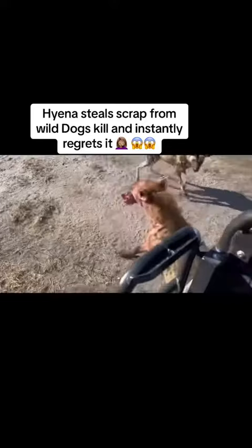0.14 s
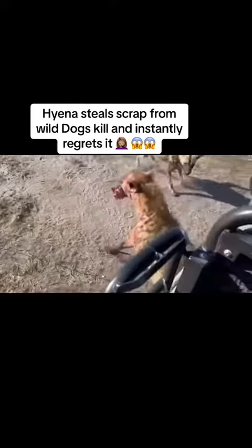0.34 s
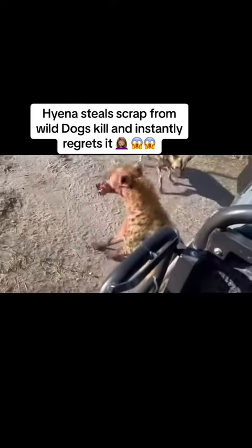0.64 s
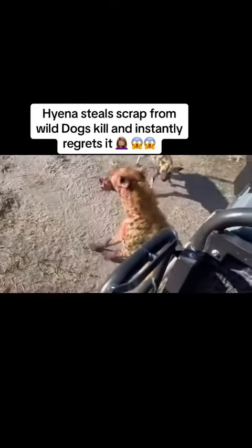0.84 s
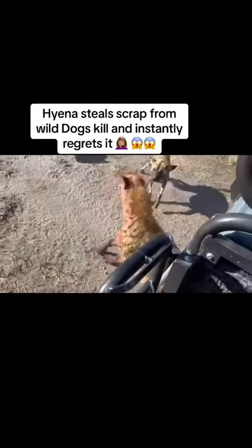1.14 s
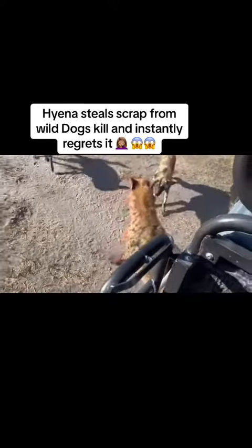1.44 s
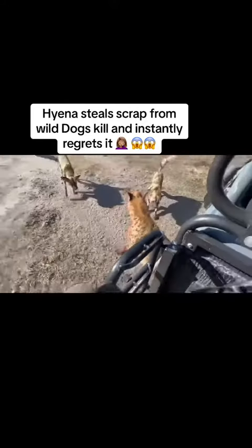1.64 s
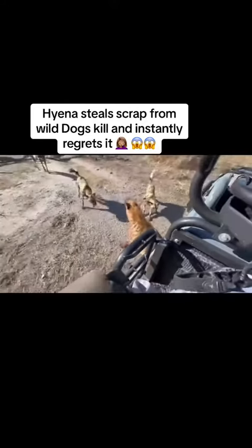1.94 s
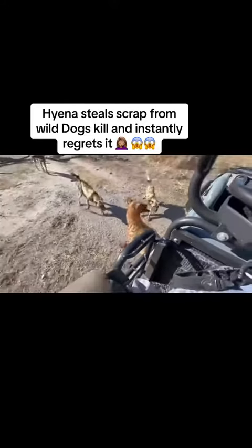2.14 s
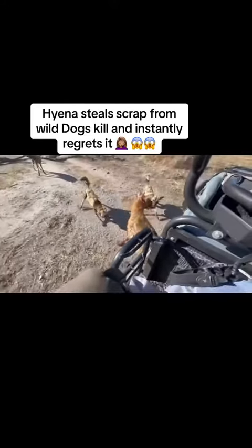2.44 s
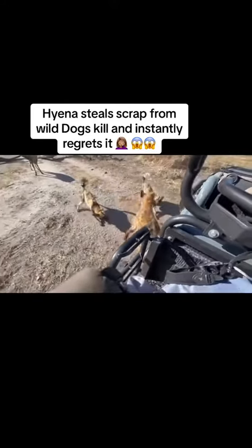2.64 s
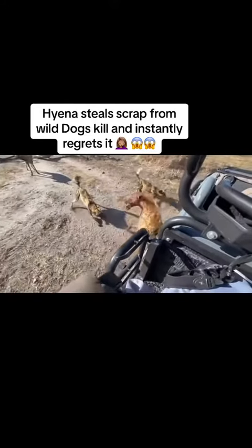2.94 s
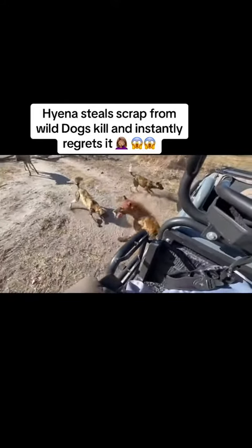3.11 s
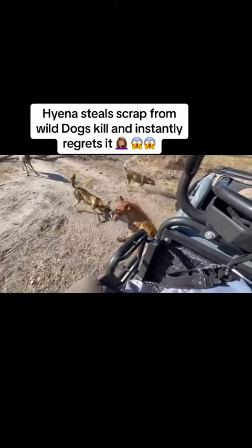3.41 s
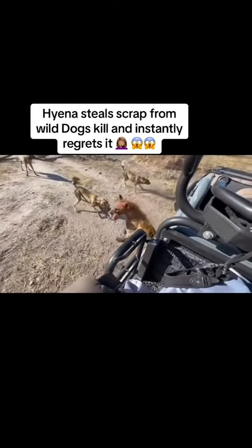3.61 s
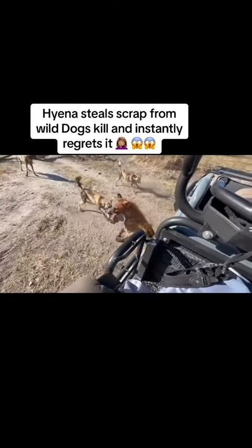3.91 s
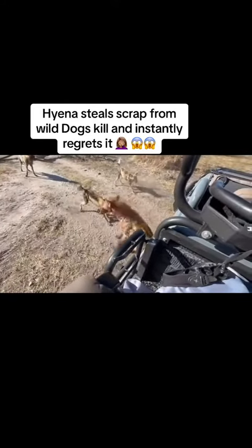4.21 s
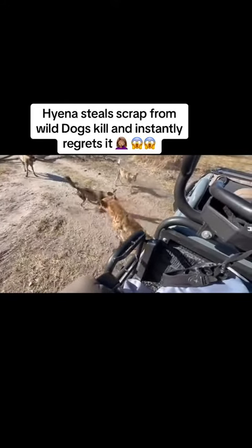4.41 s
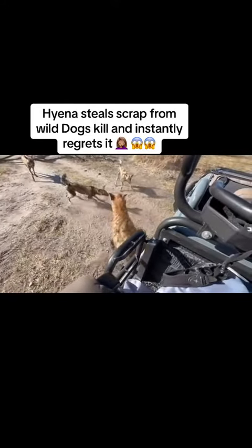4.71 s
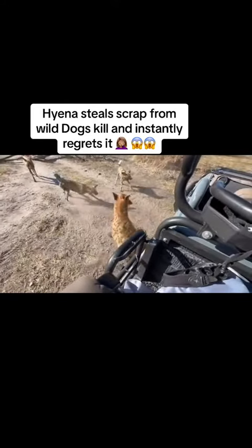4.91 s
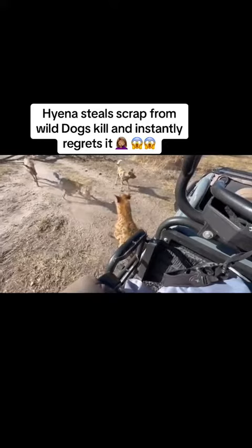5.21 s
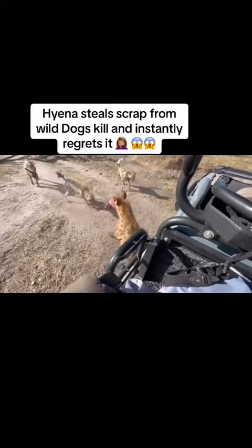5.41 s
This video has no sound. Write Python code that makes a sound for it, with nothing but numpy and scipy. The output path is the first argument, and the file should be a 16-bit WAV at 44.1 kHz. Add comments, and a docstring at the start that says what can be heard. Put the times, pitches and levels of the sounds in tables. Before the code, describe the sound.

A hyena gives a series of short, hoarse growls close by while wild dogs answer with high, wavering squeals, brief snarls and a couple of yips near the end. Paws scuff and slide on dry gravel throughout. Wind thumps against the microphone, hardest in the first second along with a few dull knocks, over a faint steady hiss of open bush.

```python
"""Hyena and wild dogs

A hyena growls hoarsely beside an open vehicle: slack vocal folds slap and excite the resonances of its
throat. Wild dogs squeal and yip around it in harmonic tones, and snarl. Paws scuff the dry gravel, and
turbulent wind buffets the microphone over the steady hiss of the bush."""
import sys
import numpy as np
from scipy import signal
from scipy.io import wavfile
from scipy.ndimage import uniform_filter1d

SR = 44100
rng = np.random.default_rng(int(sys.argv[2]) if len(sys.argv) > 2 else 0)


def generate_wav(sig):
    """Save sig (samples, or channels by samples) to the path in sys.argv[1] as 16-bit PCM at SR."""
    pcm = np.round(np.clip(np.atleast_2d(sig).T, -1, 1) * 32767).astype(np.int16)
    wavfile.write(sys.argv[1], SR, pcm)


N = 244785

# Five resonances of the throat at rest: centre_hz, nominal_width_hz, offset_db
THROAT_RESONANCES = [(386.8, 182, 0), (865, 214, 0), (1308, 290, -1.5), (2059, 200, -16.5),
                     (3590, 130, -28)]
# Throat shape, one row a growl: mean_third_resonance_hz, looseness (0-1), upper_over_third_db
THROAT_SHAPES = [(1345, 0.55, -2), (1300, 0.52, -9), (1385, 0.86, -1), (1410, 1, 3), (1355, 0.52, 1),
                 (1315, 0.37, 2.5), (1328, 0.54, 5.5)]
# Fold vibration, one row a growl: slap_rate_hz, alternate_slap_weakening (0-1)
FOLD_VIBRATIONS = [(80, .2), (120, .2), (86, .2), (95, .1), (95, .15), (100, .15), (95, .15)]
# Resonance contours, one table a growl: time_s, first_db, second_db, third_db, second_resonance_hz
GROWL_CONTOURS = [
    [(0.008, -13.5, -27, -30, 830), (0.03, -19.5, -29, -26.5, 850), (0.082, -19, -33.5, -29, 900),
     (0.182, -21, -28.5, -27.5, 780), (0.246, -16, -31.5, -28, 845), (0.29, -16.5, -28, -23.5, 785),
     (0.314, -20.5, -26.5, -29.5, 824), (0.452, -25, -36, -26, 768), (0.472, -15.5, -17.5, -27.5, 734),
     (0.542, -30, -43, -31.5, 755), (0.598, -25.5, -43, -40, 736), (0.63, -35, -46, -51, 759)],
    [(1.272, -37, -22.5, -35, 874), (1.298, -19.5, -30, -35, 841), (1.332, -24, -24, -34, 850),
     (1.352, -26, -24.5, -27, 867), (1.414, -24, -26, -28.5, 854), (1.436, -26.5, -28, -26, 857),
     (1.492, -26, -28.5, -35, 854), (1.598, -41, -39.5, -44, 844), (1.62, -46, -50, -51, 859)],
    [(2.484, -19.5, -31, -53, 790), (2.516, -22, -29.5, -39, 864), (2.542, -22.5, -29, -36, 840),
     (2.558, -19, -19.5, -37, 810), (2.588, -18, -23, -28.5, 784), (2.624, -17.5, -21, -32, 750),
     (2.68, -23, -26.5, -29, 735), (2.696, -20, -37, -33.5, 720), (2.77, -38.5, -52, -53, 732)],
    [(2.84, -39, -60, -54, 820), (2.884, -37, -42, -58, 820), (2.924, -33, -47, -36, 800),
     (2.96, -54, -48, -65, 800)],
    [(3.25, -35, -71, -48, 770), (3.266, -31.5, -66, -52, 750), (3.304, -42, -51.5, -59, 774),
     (3.34, -29.5, -43, -57, 745), (3.388, -26.5, -39, -39, 730), (3.438, -24.5, -47, -48, 735),
     (3.498, -29, -37, -47, 750), (3.554, -38.5, -57, -52, 760), (3.57, -45, -60, -45, 750)],
    [(4.12, -37, -38, -40, 830), (4.152, -28.5, -32, -27.5, 846), (4.188, -32, -34, -33, 825),
     (4.208, -39, -41, -28, 800), (4.238, -38, -31, -26.5, 786), (4.274, -48, -33, -44, 760),
     (4.296, -32, -34, -32, 780), (4.328, -30, -25, -32.5, 753), (4.446, -31, -29.5, -26.5, 808),
     (4.52, -36, -29, -38.5, 807), (4.566, -43, -30, -35, 870), (4.596, -41, -40, -50, 840),
     (4.622, -40, -35, -58, 815), (4.66, -44, -52, -45, 807)],
    [(5.21, -35, -38, -42, 759), (5.234, -41, -35, -35.5, 763), (5.298, -30.5, -37, -33, 684),
     (5.374, -36.5, -39.5, -36.5, 700), (5.416, -31.5, -36, -28.5, 710), (5.444, -39, -39, -31, 735),
     (5.472, -28.5, -37.5, -28, 790), (5.528, -35, -48, -46, 700), (5.55, -41, -37, -50, 689)],
]
THIRD_GLIDE_SHARE, THROAT_SHAKE_SHARE = 0.27, 0.03
GROWL_NOTCH_HZ, GROWL_NOTCH_WIDTH_HZ = 1063, 143  # a dark gap between the second and third resonances
GROWL_ATTACK_S, GROWL_RELEASE_S = 0.005, 0.013


def growl(contour, third_hz, looseness, upper_db, slap_hz, weakening):
    """Source and filter: fold slaps ring the throat; resonances of opposite sign leave dark valleys."""
    start_s, (first_db, second_db, third_db, second_hz) = unrolled(contour)
    t = np.arange(len(second_hz)) / SR
    drive = fold_slaps(len(t), slap_hz, jitter=0.22, air_share=0.54, weakening=weakening)
    third_hz = third_hz * (second_hz / second_hz.mean()) ** THIRD_GLIDE_SHARE
    glides = [1, second_hz / THROAT_RESONANCES[1][0], third_hz / THROAT_RESONANCES[2][0], 1, 1]
    levels_db = [first_db, second_db, third_db, third_db + upper_db, third_db + upper_db]
    voice = 0
    for k, (rest_hz, width, offset_db) in enumerate(THROAT_RESONANCES):
        # a loose, shaking throat smears each resonance into a broad band
        shake = 1 + THROAT_SHAKE_SHARE / np.sqrt(k + 1) * wander(len(t), 18)
        hz = rest_hz * glides[k] * shake
        tight = unit_rms(resonate(drive, hz, 0.28 * width))
        flanks = sum(resonate(drive, hz + side * 0.37 * width, width) for side in (-1, 1))
        smeared = unit_rms(resonate(flanks, hz, 0.73 * width))
        ringing = steady_breath(unit_rms((1 - looseness) * tight + looseness * smeared))
        voice = voice + (-1) ** k * gain_of(offset_db + levels_db[k]) * ringing
    voice = butterworth(voice, 3, 250, "high")  # the head radiates little bass
    notch = signal.iirnotch(GROWL_NOTCH_HZ, GROWL_NOTCH_HZ / GROWL_NOTCH_WIDTH_HZ, fs=SR)
    voice = signal.lfilter(*notch, voice)
    surges = unit_rms(gain_of(0.5 * wander(len(t), 9.1)))
    envelope = np.clip(np.minimum(t / GROWL_ATTACK_S, (t[-1] - t) / GROWL_RELEASE_S), 0, 1)
    return start_s, surges * envelope * voice


def fold_slaps(count, slap_hz, jitter, air_share, weakening):
    """Glottal pulses: slack folds slap unevenly with puffs of air; every second slap may be weaker."""
    cycles = np.cumsum(slap_hz * (1 + jitter * wander(count, 40))) / SR
    force = 1 - weakening * (np.floor(cycles) % 2)
    slaps = np.diff(np.floor(cycles), prepend=0) * force * gain_of(2 * wander(count, 60))
    puffs = force * (1 + np.exp(-(cycles % 1) / 2.7)) * rng.standard_normal(count)
    return (1 - air_share) * unit_rms(slaps) + air_share * unit_rms(puffs)


def steady_breath(x):
    """Compression: steady breath pressure evens out the swings slower than a few slaps."""
    envelope = np.sqrt(abs(uniform_filter1d(x ** 2, size=1100)) + 0.05)
    return unit_rms(x / envelope ** 0.55)


# Chest hum under the end of the third growl: time_s, pitch_hz, fundamental_db, second_harmonic_db
CHEST_CONTOUR = [(2.572, 103.6, -50, -33), (2.62, 100, -40, -23), (2.645, 99.7, -38, -28),
                 (2.658, 102, -23, -28), (2.706, 92, -30, -38.5), (2.746, 88, -24.5, -38.5),
                 (2.772, 85, -39, -50), (2.8, 85, -48, -54)]


def chest_hum():
    """Nearly periodic vibration: the chest hums in two low, slightly unsteady harmonics."""
    start_s, (hz, first_db, second_db) = unrolled(CHEST_CONTOUR)
    phase = 2 * np.pi * np.cumsum(hz * (1 + 0.03 * wander(len(hz), 25))) / SR
    hum = gain_of(first_db) * np.sin(phase) + gain_of(second_db) * np.sin(2 * phase)
    return start_s, np.sqrt(2) * hum


# Hoarseness, one value a squeal: greatest_flutter_depth (0-1)
FLUTTER_LIMITS = [.2, .45, .28, .28, .25, .33, .3, .34, .5, .5, .35]
# Dog cries, one table a squeal: time_s, pitch_hz, fundamental_db, second_harmonic_db, third_harmonic_db
SQUEAL_CONTOURS = [
    [(0.6, 1874, -34, -55, -61), (0.618, 1910, -32, -53, -52), (0.65, 1919, -32.5, -48.5, -69),
     (0.736, 1931, -35, -48, -57), (0.75, 1941, -42, -42.5, -72), (0.818, 1982, -35, -43, -71),
     (0.85, 2007, -43.5, -71, -69), (0.896, 1985, -36, -43, -70), (0.906, 1934, -38, -34, -53),
     (0.924, 1877, -32, -31, -53), (0.956, 1883, -31.5, -45, -71), (1.008, 1809, -39, -46, -59),
     (1.036, 1823, -30, -40.5, -71), (1.052, 1847, -30, -46, -49), (1.076, 1846, -33, -46, -50),
     (1.108, 1826, -34.5, -42.5, -71), (1.166, 1872, -35.5, -51, -70), (1.174, 1835, -45, -43, -57),
     (1.196, 1940, -30.5, -45, -68), (1.222, 1930, -33.5, -46, -49), (1.246, 1960, -39, -43, -59),
     (1.262, 1930, -41, -67, -72), (1.286, 1900, -47, -69, -70), (1.3, 1891, -57, -50, -71)],
    [(1.565, 2143, -25, -45, -61), (1.575, 2108, -16, -38, -51), (1.579, 2073, -14, -39, -76),
     (1.581, 2058, -10.5, -44, -57), (1.591, 2062, -11.5, -42, -55), (1.603, 2107, -9, -26, -40.5),
     (1.621, 2103, -13, -29, -49), (1.643, 1962, -21.5, -39, -73), (1.653, 1955, -21, -40, -61),
     (1.655, 1952, -21.5, -36, -71), (1.673, 1980, -21.5, -38, -56), (1.679, 2025, -24.5, -42, -66),
     (1.703, 2050, -14.5, -43, -55), (1.713, 2042, -16.5, -39, -44), (1.737, 1980, -27.5, -38, -72),
     (1.749, 1995, -29, -33, -43), (1.777, 1928, -23, -38, -63), (1.795, 1920, -42, -50, -67)],
    [(2.04, 1866, -37, -72, -71), (2.062, 1877, -28, -53, -50), (2.078, 1920, -40, -34.5, -76),
     (2.094, 2080, -31, -51, -79), (2.118, 2038, -36, -41, -70), (2.166, 2100, -32, -47, -79),
     (2.204, 2106, -32.5, -44, -60), (2.236, 2100, -45, -69, -79), (2.24, 2093, -47, -59, -73)],
    [(2.4, 1928, -52, -41, -67), (2.422, 1836, -34, -29.5, -35.5), (2.442, 1793, -31.5, -36, -69),
     (2.47, 1720, -45, -56, -66), (2.486, 1774, -34, -48, -79), (2.504, 1795, -36, -52, -64),
     (2.52, 1765, -45, -45, -76)],
    [(2.59, 1909, -46, -46, -54), (2.6, 1903, -35, -38, -48), (2.622, 1843, -47, -32, -48),
     (2.64, 1850, -42, -31.5, -51), (2.656, 1774, -42, -33, -48), (2.672, 1779, -43, -38, -37),
     (2.692, 1791, -41, -35, -45), (2.714, 1796, -33, -31, -43), (2.728, 1814, -30, -34, -39),
     (2.738, 1818, -33, -38, -42), (2.762, 1802, -28.5, -26.5, -44), (2.784, 1769, -39, -34, -62),
     (2.8, 1820, -43, -52, -55)],
    [(3.044, 2050, -21, -44, -56), (3.056, 2011, -27, -34, -35.5), (3.068, 1998, -27, -32, -40),
     (3.094, 2092, -16.5, -25.5, -50), (3.108, 2144, -15, -38.5, -55), (3.132, 2079, -20, -28, -53),
     (3.152, 2066, -25.5, -35, -53), (3.162, 2068, -28, -32, -47), (3.18, 2076, -24.5, -29.5, -50.5),
     (3.212, 2077, -15.5, -29.5, -46), (3.234, 2079, -17, -29, -50), (3.264, 2090, -15.5, -28.5, -48),
     (3.28, 2057, -28, -31.5, -48), (3.298, 2045, -22.5, -37, -41.5), (3.328, 2024, -28, -36, -49),
     (3.412, 2053, -26, -33.5, -44), (3.442, 2119, -29.5, -41, -54), (3.466, 2078, -28, -40, -51),
     (3.486, 2095, -22.5, -35, -37), (3.496, 2093, -27, -41, -54), (3.506, 2089, -30, -37, -44),
     (3.528, 2098, -22.5, -38, -48), (3.56, 2076, -23, -35, -44), (3.61, 2052, -28.5, -43, -48),
     (3.638, 2045, -24.5, -38, -45), (3.668, 2022, -23.5, -44, -46), (3.684, 2035, -26, -40.5, -49.5),
     (3.724, 1968, -30.5, -36.5, -44), (3.748, 1933, -25.5, -37, -54.5), (3.782, 1933, -27.5, -45, -38),
     (3.79, 1900, -21, -45, -45), (3.81, 1849, -17.5, -36, -49), (3.842, 1883, -30.5, -39.5, -49),
     (3.872, 1894, -23.5, -49, -52), (3.9, 1924, -33, -40, -54), (3.91, 1933, -35, -43, -47)],
    [(3.915, 1920, -37, -65, -72), (3.929, 1880, -31.5, -70, -70), (4.005, 1883, -39, -65, -70)],
    [(3.89, 1898, -29, -42, -53), (3.906, 1914, -35, -37.5, -49), (3.942, 1981, -49, -40, -51),
     (3.97, 2039, -34, -39, -47), (3.996, 2065, -27, -41, -56), (4.016, 2046, -30, -43, -53),
     (4.022, 2020, -25, -41, -55), (4.042, 2016, -26.5, -46, -53), (4.062, 2047, -27, -49, -60),
     (4.1, 2006, -41, -39, -52)],
    [(4.098, 2070, -36, -39, -60), (4.108, 1860, -23.5, -42, -60), (4.118, 1750, -30, -57, -70),
     (4.13, 1740, -37, -65, -70)],
    [(4.39, 1930, -40, -70, -62), (4.394, 1948, -29, -42, -63), (4.412, 1798, -22.5, -30.5, -64),
     (4.426, 1770, -35, -38, -92), (4.44, 1944, -50, -59, -58)],
    [(4.675, 1960, -43, -61, -64), (4.697, 1882, -24, -45, -50), (4.701, 1870, -28, -68, -73),
     (4.705, 1833, -24.5, -56, -62), (4.717, 1802, -20, -41, -67), (4.727, 1774, -21.5, -32.5, -39),
     (4.757, 1780, -22.5, -44, -54), (4.79, 1720, -44, -55, -46)],
]
STEADY_DB, FLUTTER_PER_DB = -17, 0.04  # a hard-driven squeal is steady; a weaker one flutters


def squeal(contour, flutter_limit):
    """Modulation: a slow second vibration flutters three whistling harmonics and lets air fray them."""
    start_s, (hz, *levels_db) = unrolled(contour)
    count = len(hz)
    flutter = np.clip(FLUTTER_PER_DB * (STEADY_DB - levels_db[0]), 0, flutter_limit)
    slow_cycles = np.cumsum(55 * (1 + 0.36 * wander(count, 27))) / SR
    vibration = np.cos(2 * np.pi * slow_cycles) * (1 + 0.25 * wander(count, 30))
    cycles = np.cumsum(hz * (1 + flutter * (0.02 * wander(count, 60) + 0.007 * vibration))) / SR
    air, voice = rng.standard_normal(count), 0
    for k, db in enumerate(levels_db, 1):
        breath_share = np.clip(1.3 * k * flutter ** 2, 0, 0.9)  # of the harmonic's power
        breath = np.sqrt(breath_share) * unit_rms(resonate(air, k * hz, 170 * np.sqrt(k)))
        harmonic = np.sqrt(2 - 2 * breath_share) * np.sin(2 * np.pi * k * cycles)
        voice = voice + gain_of(db) * (harmonic + breath)
    tremolo = (1 + flutter * vibration) / np.sqrt(1 + flutter ** 2 / 2)
    return start_s, voice * tremolo * signal.windows.tukey(count, min(1, 0.008 * SR / count))


# Open-mouth spectrum, harmonics 1-18: relative_db
YIP_HARMONICS_DB = [-30, -1, -7.5, -7.5, -2.5, -15.5, -16.5, -31, -25, -20, -18, -19, -36, -35, -32, -27,
                    -24, -25]
# Yips: start_s, length_s, level_db, second_harmonic_start_hz, second_harmonic_end_hz, tilt_rate_db
YIP_CALLS = [(5.031, 0.0576, -24, 918, 840, 7), (5.125, 0.038, -24.5, 890, 915, 4)]


def yip(start_s, length_s, level_db, from_hz, to_hz, tilt_rate_db):
    """Changing spectral tilt: a short, hoarse harmonic cry swells and brightens as the mouth opens."""
    count = round(length_s * SR)
    progress = np.arange(count) / count
    pitch_hz = (from_hz + (to_hz - from_hz) * progress) / 2
    cycles = np.cumsum(pitch_hz * (1 + 0.015 * wander(count, 120))) / SR
    tilt_db = tilt_rate_db * np.minimum(progress - 0.6, 0)  # per harmonic, up to the fifth
    tone = sum(gain_of(db + tilt_db * min(k - 2, 3)) * np.sin(2 * np.pi * k * cycles + k * k)
               for k, db in enumerate(YIP_HARMONICS_DB, 1))
    hoarseness = 1 + 0.2 * wander(count, 130)
    envelope = np.clip(np.minimum(progress / 0.37, (1 - progress) / 0.18), 0, 1)
    return start_s, gain_of(level_db) * tone * hoarseness * envelope


# A dog's dry snarls: start_s, length_s, start_level_db, end_level_db, mouth_resonance_hz
SNARLS = [(0.997, 0.28, -45.5, -29, 1024), (2.145, 0.088, -46, -45.5, 1100), (3.931, 0.12, -35, -44, 1000),
          (4.1, 0.071, -29.5, -36, 1740), (1.753, 0.057, -37, -35, 1820), (4.114, 0.084, -44, -29, 1050),
          (4.724, 0.077, -31.5, -31.5, 924)]


def snarl(start_s, length_s, from_db, to_db, mouth_hz):
    """Formant filtering: rough puffs from the folds pass through one wide mouth resonance."""
    puffs = fold_slaps(round(length_s * SR), slap_hz=47.3, jitter=0.19, air_share=1, weakening=0)
    envelope = gain_of(np.linspace(from_db, to_db, len(puffs))) * signal.windows.tukey(len(puffs), 0.3)
    return start_s, envelope * unit_rms(resonate(puffs, mouth_hz, 280))


# Thin, high squeaks and hisses: start_s, length_s, pitch_hz, level_db, width_hz
SQUEAKS = [(4.125, 0.045, 6640, -42, 200), (4.424, 0.041, 6350, -41.5, 200), (2.583, 0.14, 7650, -49, 3000),
           (2.788, 0.11, 8000, -45, 3000), (5.157, 0.078, 7760, -42.5, 1500),
           (5.158, 0.026, 5070, -39, 900)]


def squeak(start_s, length_s, pitch_hz, level_db, width_hz):
    """Band-limited noise: a narrow band is heard as a breathy whistle, a wide one as a hiss."""
    whistle = unit_rms(resonate(rng.standard_normal(round(length_s * SR)), pitch_hz, width_hz))
    return start_s, gain_of(level_db) * whistle * signal.windows.tukey(len(whistle), 0.5)


# Short knocks: start_s, level_db, start_pitch_hz, end_pitch_hz, length_s
KNOCK_BURSTS = [(0.4725, 2, 514, 113, 0.0151), (0.7885, -8, 542, 325, 0.0134),
                (0.808, -7.5, 289, 423, 0.012), (0.67, -10.5, 214, 190, 0.024),
                (0.277, -7.5, 300, 217, 0.014)]


def knock(start_s, level_db, from_hz, to_hz, length_s):
    """Tone burst: a few cycles that swell, glide in pitch and stop are heard as a knock."""
    progress = np.arange(round(length_s * SR)) / (length_s * SR)
    cycles = np.cumsum(from_hz * (to_hz / from_hz) ** progress) / SR + rng.random()
    envelope = np.sin(np.pi * progress) ** 1.4 * (1 + 0.25 * wander(len(progress), 200))
    return start_s, gain_of(level_db) * envelope * np.sin(2 * np.pi * cycles)


# Short dry clicks: start_s, unfiltered_level_db, cutoff_hz
CLICKS = [(4.1785, -10, 1700), (4.78, -24, 2500), (5.1605, -18, 10000)]


def clicks():
    """Impulsive excitation: each click is a low-passed pulse with noise that dies 60 dB in 4 ms."""
    out, t = np.zeros(N), np.arange(400) / SR
    for start_s, level_db, cutoff_hz in CLICKS:
        pulse = t < 0.0001
        click = gain_of(level_db - 60 * t / 0.004) * (pulse + 0.5 * rng.standard_normal(len(t)))
        add(out, start_s, butterworth(click, 2, cutoff_hz, "low"))
    return out


# Spectrum of sliding gravel: frequency_hz, relative_density_db
GRAVEL_SPECTRUM = [(300, -23.5), (1000, 6), (2200, 3), (2800, -1.5), (5000, -4.5), (8500, -9.5),
                   (10000, -18)]
# Paw slides: loudest_moment_s, level_db, length_s
PAW_SCUFFS = [(0.0, -40, 0.076), (0.136, -40.5, 0.58), (0.505, -46.5, 0.42), (0.89, -49, 0.062),
              (1.355, -49, 0.11), (1.498, -35.5, 0.26), (1.713, -49.5, 0.25), (2.408, -42, 0.2),
              (2.618, -38.5, 0.21), (2.856, -36.5, 0.29), (3.0, -51, 0.14), (3.42, -33, 0.14),
              (3.606, -33, 0.11), (3.803, -33.5, 0.11), (4.15, -44.5, 0.47), (4.534, -44, 0.37),
              (4.58, -37.5, 0.08), (4.818, -44.5, 0.69), (5.09, -40, 0.2), (5.163, -33, 0.045),
              (5.207, -49, 0.065), (5.507, -42, 0.68)]
SHUFFLE_DB = -51  # steady shuffling between the scuffs


def paws():
    """Friction noise: dense grains of grit rub under sliding paws; each scuff swells and dies."""
    t = np.arange(N) / SR
    scuffs = sum(gain_of(db) * np.exp(-4 * abs(t - s) / length_s) for s, db, length_s in PAW_SCUFFS)
    grit = shaped_noise(lambda hz, t: spectrum_gain(GRAVEL_SPECTRUM, hz), size=256, patchy_db=2.5)
    grains = gain_of(0.55 * wander(N, 280))
    return (gain_of(SHUFFLE_DB) + scuffs) * unit_rms(grit * grains)


# Eddies that strike the microphone: start_s, peak_db, brightness (0-1), length_s
EDDIES = [(0.142, -9, 0.57, 0.026), (0.275, -7, 0.54, 0.024), (0.423, -7.5, 0.72, 0.024),
          (0.462, -5, 0.31, 0.022), (0.498, -25, 0.3, 0.034), (0.591, -13, 0.57, 0.031),
          (0.636, -13, 0.25, 0.011), (0.822, -9.5, 0.05, 0.024), (1.016, -13, 0.62, 0.033),
          (1.064, -16, 0.57, 0.039), (1.098, -13, 0.57, 0.019), (3.063, -22.5, 0.43, 0.036),
          (3.627, -20, 0.46, 0.036), (4.105, -18.5, 0.37, 0.051), (4.244, -15.5, 0.34, 0.019),
          (4.765, -15, 0.69, 0.026), (4.902, -22, 0.51, 0.06)]


def buffets():
    """Pressure transients: each eddy is a brief thud of low-frequency noise."""
    out, count = np.zeros(N), 4096
    for start_s, peak_db, brightness, length_s in EDDIES:
        rumble = butterworth(rng.standard_normal(2 * count), 3, [70, 130 * 6 ** brightness], "band")
        progress = np.arange(count) / SR / length_s
        thud = rumble[count:] * progress * np.exp(-3 * progress)
        add(out, start_s, gain_of(peak_db) * thud / abs(thud).max())
    return out


# Wind at the microphone: time_s, level_db, brightness (0-1)
WIND_CONTOUR = [(0.0, -26, 0.7), (0.02, -24, 0.9), (0.29, -15, 0.79), (0.4, -23.5, 0.94), (0.481, -13, 1),
                (0.52, -22.5, 0.9), (0.65, -18.5, 0.85), (0.68, -24.5, 0.79), (0.83, -13.5, 0.5),
                (0.91, -25.5, 0.35), (1.13, -18, 0.23), (1.21, -32.5, 0.14), (1.98, -40.5, 0.64),
                (2.12, -31, 0.56), (2.21, -52, 0.4), (2.55, -34, 1), (2.61, -27.5, 0.97),
                (2.75, -30.5, 0.4), (2.81, -35, 0.6), (2.891, -29.5, 0.8), (3.01, -44.5, 0.92),
                (3.09, -23, 0.5), (3.15, -44, 0.6), (3.52, -37.5, 0.5), (3.65, -28.5, 0.4),
                (3.8, -37.5, 0.6), (3.85, -22, 0.87), (4.03, -30.5, 0.9), (4.1, -24.5, 0.87),
                (4.68, -29.5, 0.86), (5.01, -29.5, 0.79), (5.07, -34.5, 0.91), (5.55, -33.5, 1)]


def wind():
    """Turbulence: lumpy noise whose spectrum falls steeply above a corner that moves with the gusts."""
    times_s, level_db, brightness = np.transpose(WIND_CONTOUR)

    def spectrum(hz, t):
        corner_hz = 45 * 8 ** np.interp(t, times_s, brightness)
        gain = 1 / (1 + (hz / corner_hz) ** 2.72)
        bass = (hz[:, 0] > 40) & (hz[:, 0] < 230)
        return gain / np.sqrt(np.sum(gain[bass] ** 2, axis=0))

    gusts = gain_of(0.9 * wander(N, 25) + 2 * wander(N, 10.6))
    turbulence = unit_rms(shaped_noise(spectrum, size=1024, patchy_db=3) * gusts)
    return turbulence * gain_of(np.interp(np.arange(N) / SR, times_s, level_db))


# Spectrum of far grass and air: frequency_hz, relative_density_db
BUSH_SPECTRUM = [(120, -43.5), (200, -5), (399, 0.5), (1090, -17.5), (1940, -0.5), (2520, -16),
                 (3740, -15.5), (6990, -18), (9390, -32), (10200, -68.5), (13300, -73), (22000, -120)]
BUSH_DB = -41.5


def bush():
    """Stationary noise: distant grass and air merge into a steady hiss."""
    hiss = shaped_noise(lambda hz, t: spectrum_gain(BUSH_SPECTRUM, hz), size=1024, patchy_db=2.5)
    return gain_of(BUSH_DB) * unit_rms(hiss)


def echoes(direct, level_db=-15, decay_60db_s=0.37):
    """Early reflections: the ground and the vehicle scatter sparse, short echoes."""
    t = np.arange(SR // 4) / SR
    taps = rng.standard_normal(len(t)) * (rng.random(len(t)) < 0.05)
    taps *= gain_of(-60 * t / decay_60db_s) * (t > 0.004)
    return gain_of(level_db) * signal.fftconvolve(direct, taps / np.linalg.norm(taps))[:N]


def gain_of(db):
    """Decibels to amplitude."""
    return 10 ** (np.asarray(db) / 20)


def unit_rms(x):
    """Normalisation to rms 1."""
    return x / np.sqrt(np.mean(x ** 2) + 1e-20)


def spectrum_gain(points, hz):
    """Amplitude of a decibel spectrum, interpolated on a log-frequency axis."""
    points_hz, db = np.transpose(points)
    return gain_of(np.interp(np.log(hz + 1), np.log(points_hz + 1), db))


def unrolled(contour):
    """Linear interpolation: the start time and each column of a contour, sample by sample."""
    times_s, *columns = np.transpose(contour)
    t = np.arange(times_s[0], times_s[-1], 1 / SR)
    return times_s[0], [np.interp(t, times_s, column) for column in columns]


def add(mix, start_s, sound):
    """Superposition of a sound on the mix."""
    part = mix[max(round(start_s * SR), 0):][:len(sound)]
    part += sound[:len(part)]


def butterworth(x, order, cutoff_hz, kind):
    """Filtering with a maximally flat passband."""
    return signal.sosfilt(signal.butter(order, cutoff_hz, kind, fs=SR, output="sos"), x)


def wander(count, rate_hz):
    """Random modulation: noise of rms 1, low-passed at rate_hz."""
    return unit_rms(butterworth(rng.standard_normal(count + SR // 4), 2, rate_hz, "low")[SR // 4:])


def resonate(x, hz, width_hz):
    """Heterodyne resonance: shifts the curve hz down to zero, smooths twice and shifts back."""
    carrier = np.exp(2j * np.pi * np.cumsum(hz * np.ones(len(x))) / SR)
    pole = np.exp(-np.pi * width_hz / SR)
    smoothed = signal.lfilter([(1 - pole) ** 2], [1, -2 * pole, pole * pole], x / carrier + 1e-18)
    return 2 * (carrier * smoothed).real


def shaped_noise(spectrum, size, patchy_db):
    """Spectral synthesis: random short-time spectra shaped by spectrum(hz, t), with drifting patches."""
    hop = size // 4
    t, hz = np.arange(N // hop + 5) * hop / SR, np.fft.rfftfreq(size, 1 / SR)[:, None]
    real, imaginary, patches = rng.standard_normal((len(t), len(hz), 3)).T
    patches = unit_rms(uniform_filter1d(uniform_filter1d(patches, size // 64, 0), 8, 1))
    frames = (real + 1j * imaginary) * spectrum(hz, t) * gain_of(patchy_db * patches)
    return signal.istft(frames, nperseg=size, noverlap=size - hop)[1][:N]


def scene():
    """Superposition: calls, knocks and clicks with their echoes, then paws, bush and wind."""
    direct = clicks()
    for source, rows in ((snarl, SNARLS), (yip, YIP_CALLS), (squeak, SQUEAKS), (knock, KNOCK_BURSTS)):
        for row in rows:
            add(direct, *source(*row))
    for contour, throat, folds in zip(GROWL_CONTOURS, THROAT_SHAPES, FOLD_VIBRATIONS):
        add(direct, *growl(contour, *throat, *folds))
    add(direct, *chest_hum())
    for contour, flutter_limit in zip(SQUEAL_CONTOURS, FLUTTER_LIMITS):
        add(direct, *squeal(contour, flutter_limit))
    return (direct + echoes(direct) + paws() + bush() + wind() + buffets())[None]


def record(dry):
    """Band limiting: deep bass is cut, loud peaks clip at full scale, then the highest treble is cut."""
    clipped = np.clip(butterworth(dry, 4, 50, "high"), -1, 1)
    low_pass = signal.firwin(511, cutoff=10250, window=("kaiser", 9), fs=SR)
    return signal.oaconvolve(clipped, low_pass[None], "same")


dry = scene()
out = record(dry)
generate_wav(out)
```